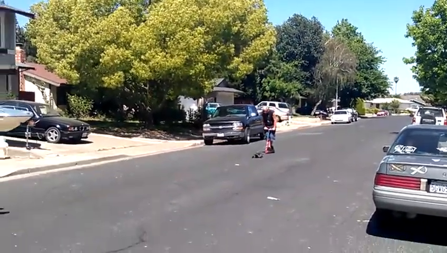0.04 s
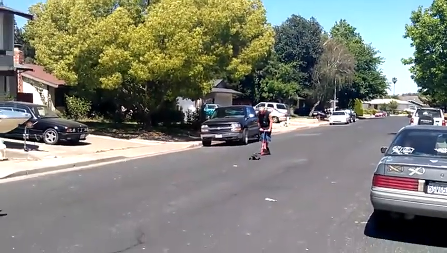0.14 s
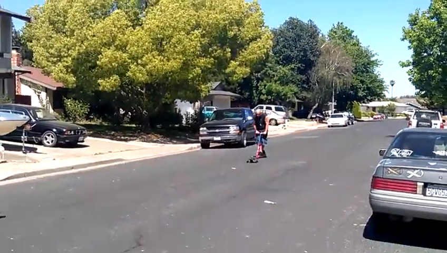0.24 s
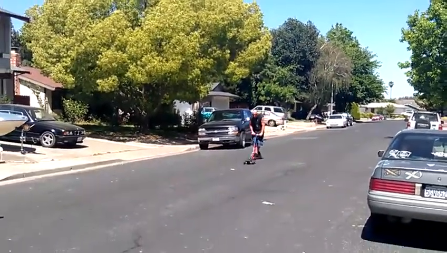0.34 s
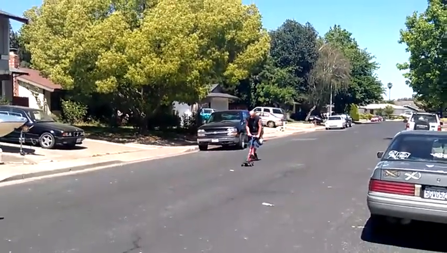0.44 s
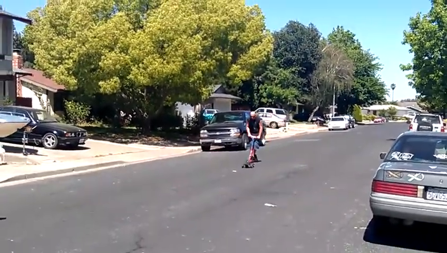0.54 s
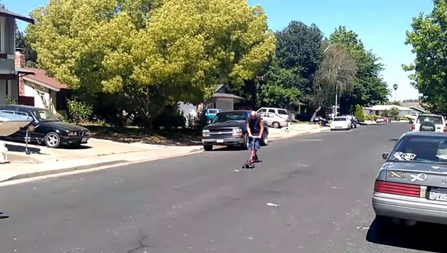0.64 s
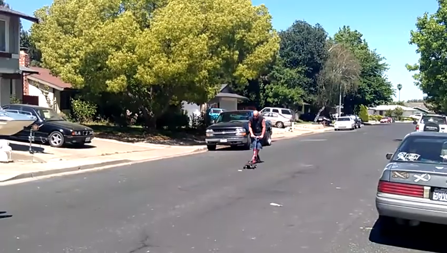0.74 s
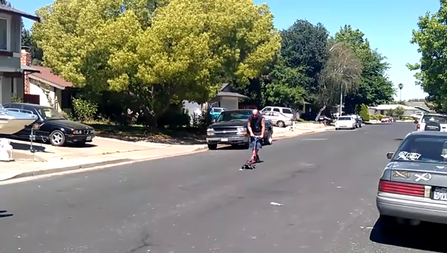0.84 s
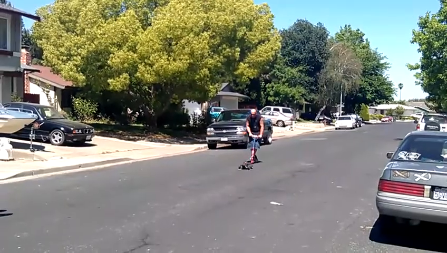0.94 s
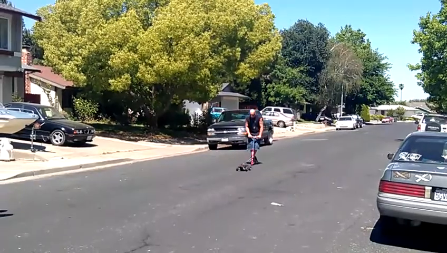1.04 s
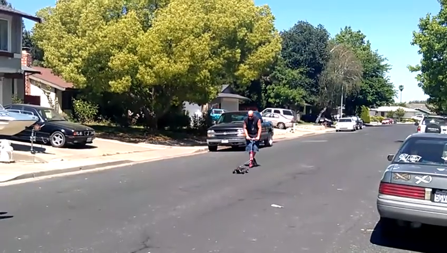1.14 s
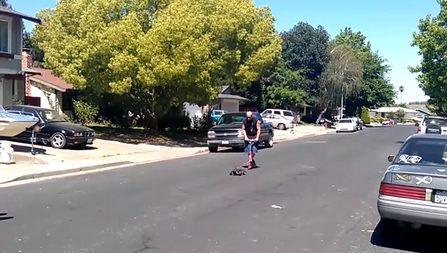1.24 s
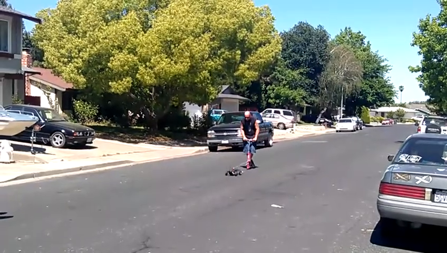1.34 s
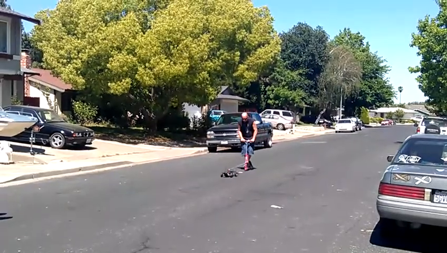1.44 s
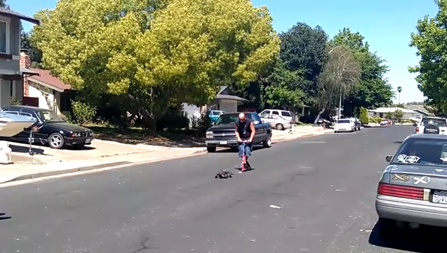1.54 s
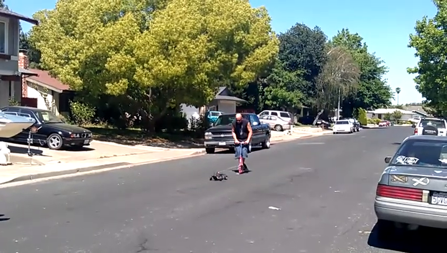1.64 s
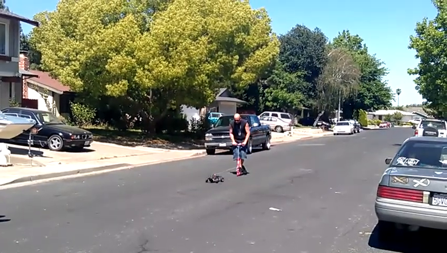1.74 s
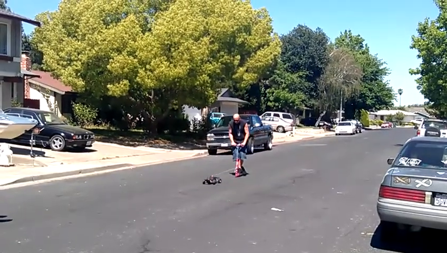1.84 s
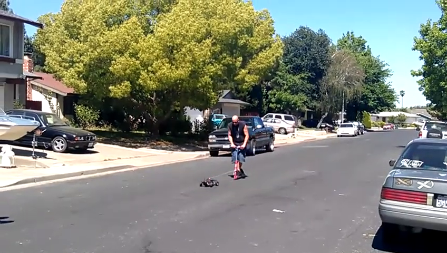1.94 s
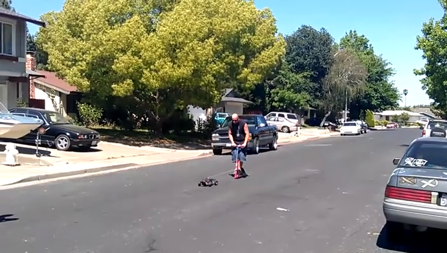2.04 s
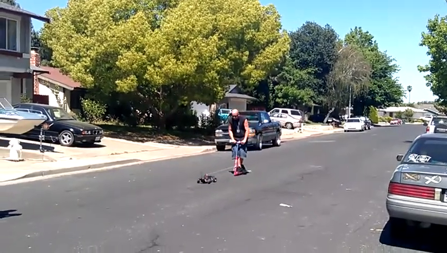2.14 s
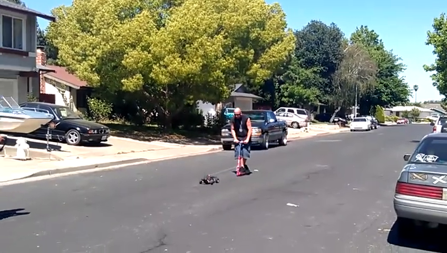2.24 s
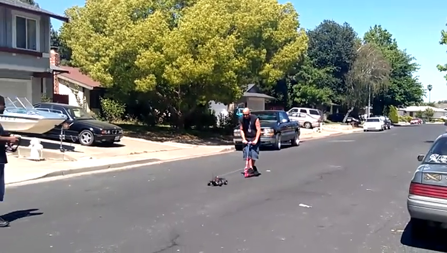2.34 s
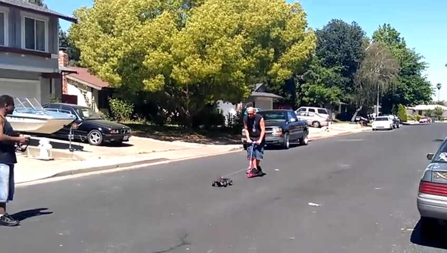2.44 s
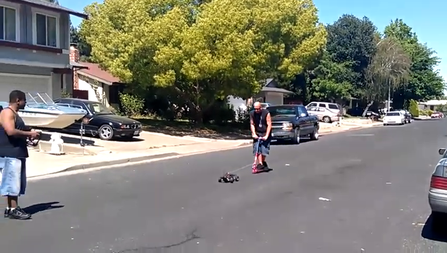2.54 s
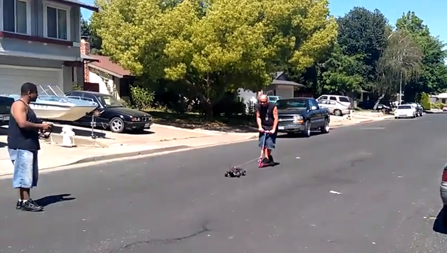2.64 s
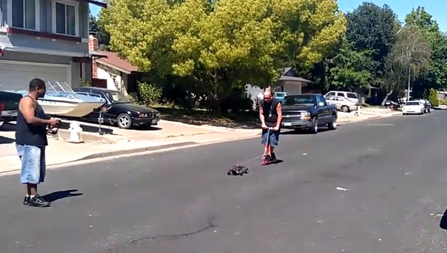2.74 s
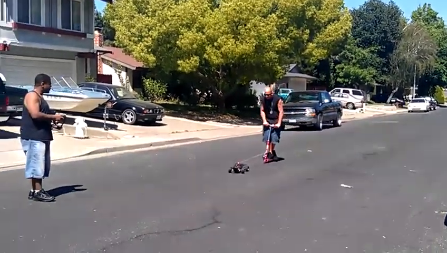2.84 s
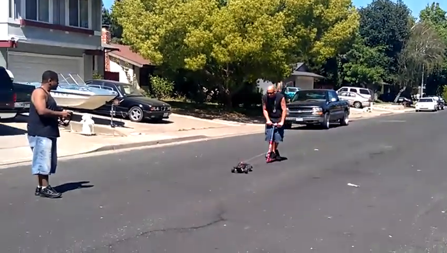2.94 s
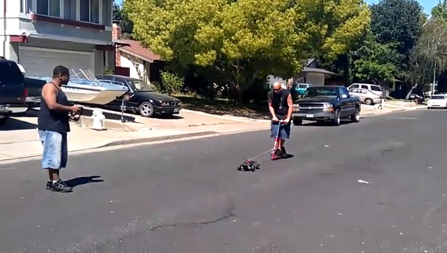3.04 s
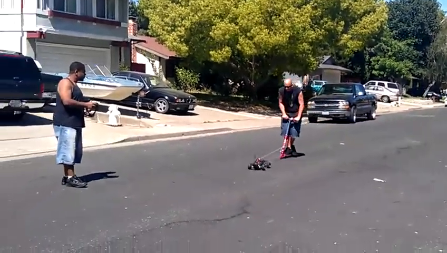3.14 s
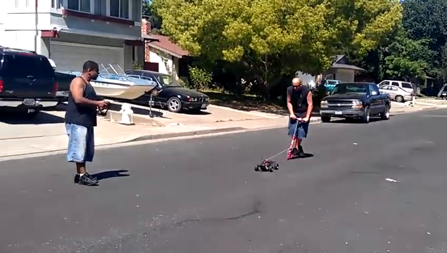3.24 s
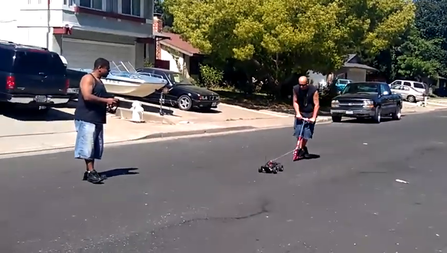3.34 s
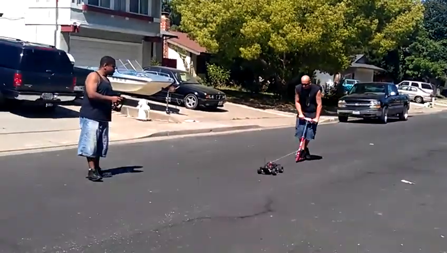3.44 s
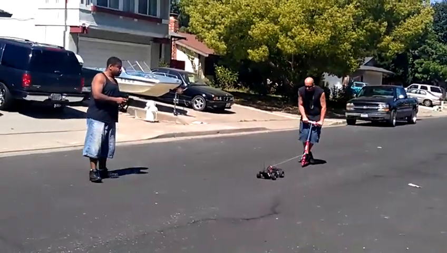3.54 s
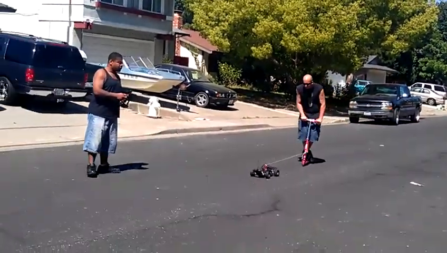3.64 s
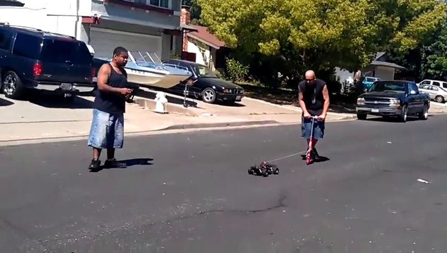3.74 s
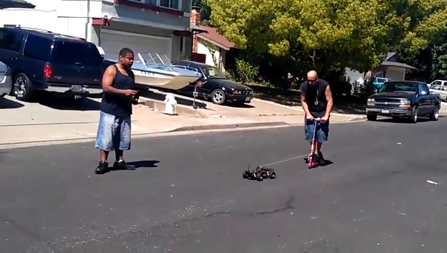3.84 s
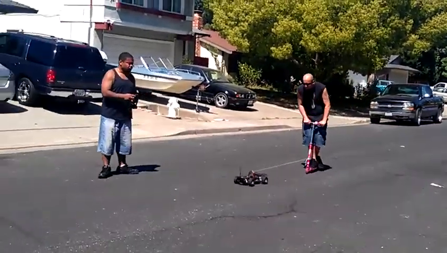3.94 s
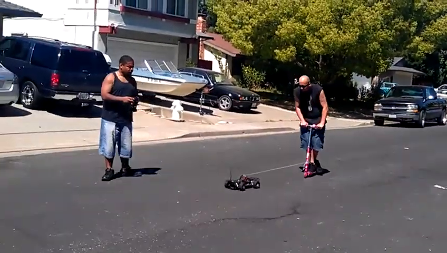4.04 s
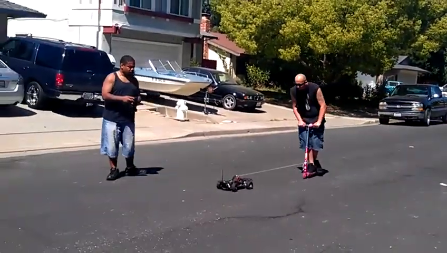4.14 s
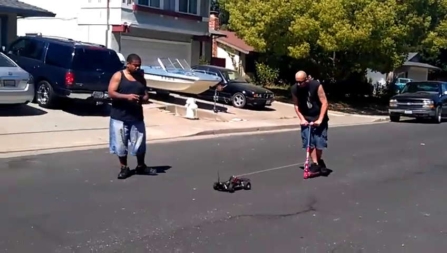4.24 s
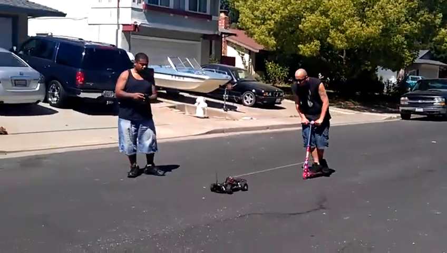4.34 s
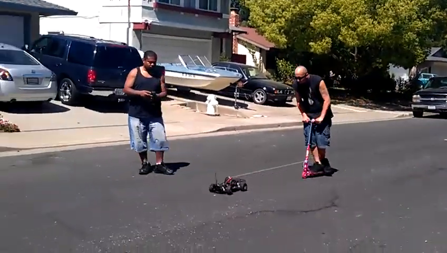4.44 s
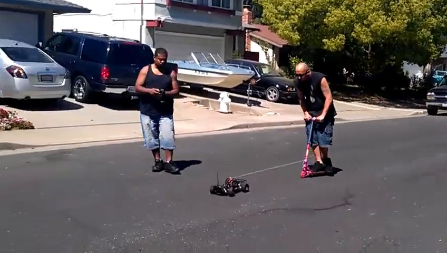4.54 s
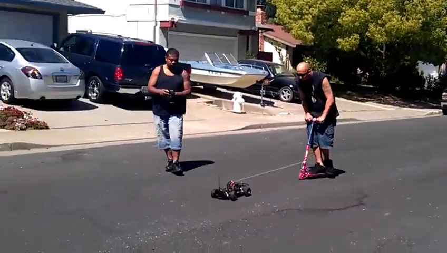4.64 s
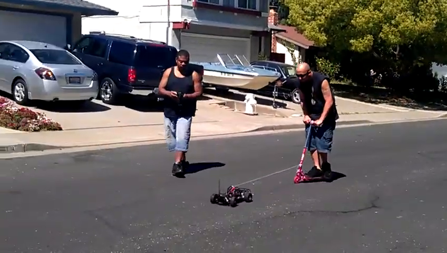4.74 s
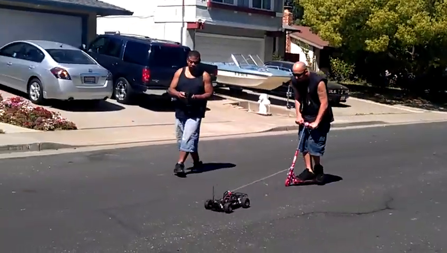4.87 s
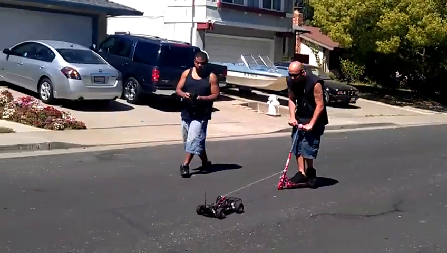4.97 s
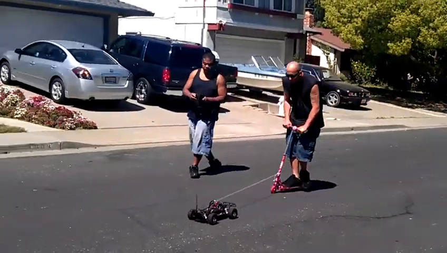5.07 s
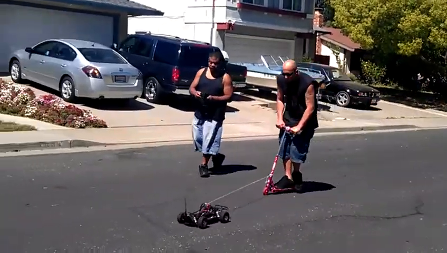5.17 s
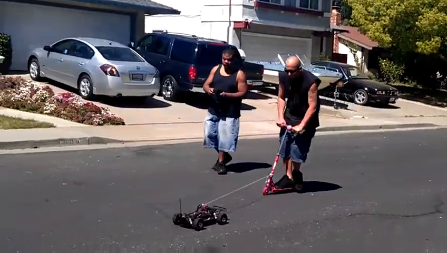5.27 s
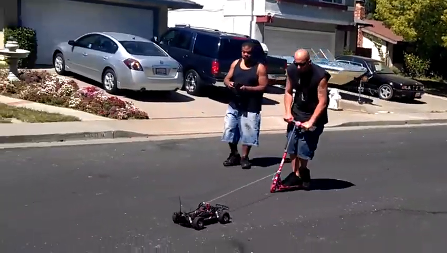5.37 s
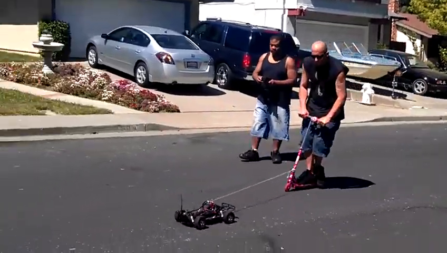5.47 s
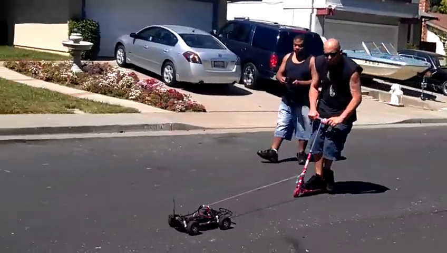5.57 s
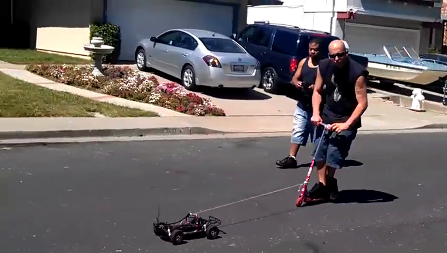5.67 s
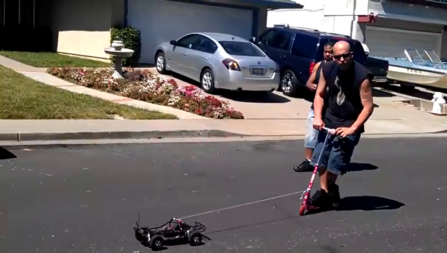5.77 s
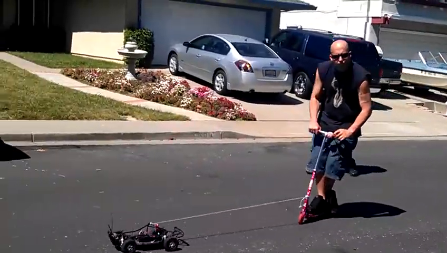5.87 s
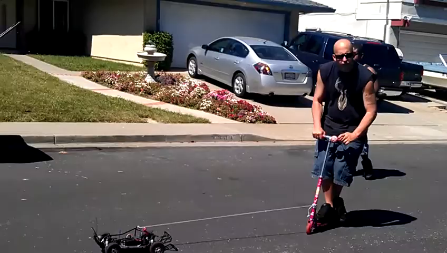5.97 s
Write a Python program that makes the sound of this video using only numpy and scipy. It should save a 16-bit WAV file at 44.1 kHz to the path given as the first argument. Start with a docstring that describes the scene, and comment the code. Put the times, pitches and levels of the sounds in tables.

```python
"""A small electric radio-controlled truck, towing a rider on a kick scooter, comes up an asphalt street.
At first its gear whine, summed from sine partials, surges weakly amid a rasp of filtered noise, with bright accents.
From about 2.7 s freely spinning tyres drive the whine higher; from about 3.8 s bursts of noise chatter at each hop.
Near 4.1 s the drivetrain is loudest and overloads the microphones; then the truck turns side-on, whining on over
a louder tyre roar and road hiss. House fronts answer with decaying noise echoes, and faint street air lies below."""
import sys
import numpy as np
from scipy import signal
from scipy.fft import rfft, irfft, next_fast_len
from scipy.io import wavfile
from scipy.ndimage import map_coordinates

SR = 44100
rng = np.random.default_rng(int(sys.argv[2]) if len(sys.argv) > 2 else 0)


def inscribe(sig):
    """Save sig as 16-bit PCM at rate SR to the path in sys.argv[1].

    A 1-D sig is mono; a 2-D sig holds one channel per row.
    Samples are clipped to [-1, 1] before scaling.
    """
    pcm = np.round(np.clip(np.atleast_2d(sig).T, -1, 1) * 32767)
    wavfile.write(sys.argv[1], SR, pcm.astype(np.int16))


N = 265041


def amp(db):
    """Level law: decibels to an amplitude ratio."""
    return 10 ** (np.asarray(db) / 20)


def unit(x):
    """Normalisation to an rms of 1."""
    return x / np.sqrt(np.mean(x ** 2) + 1e-20)


def clock():
    """Sampled time in seconds."""
    return np.arange(N) / SR


def along(points, hz):
    """Interpolation of (frequency, value) points on a logarithmic frequency axis."""
    f, v = np.transpose(points)
    return np.interp(np.log(hz + 1), np.log(f + 1), v)


def curves(rows):
    """Linear interpolation in time: one value per sample for each column after the time."""
    s, *cols = np.transpose(rows)
    return [np.interp(clock(), s, c) for c in cols]


def wobble(rate):
    """Band-limited fluctuation: a smooth random curve with rate knots a second."""
    knots = rng.standard_normal(int(N * rate / SR) + 4)
    return map_coordinates(knots, [np.arange(N) * rate / SR])


def filtered(x, response):
    """Linear filtering: the spectrum of x times a response of frequency."""
    m = next_fast_len(N + SR // 4)
    return irfft(rfft(x, m) * response(np.fft.rfftfreq(m, 1 / SR)), m)[..., :N]


# Stereo width of the noises: frequency_hz, side_minus_mid_db
STEREO_WIDTH = [(60, -1), (110, -5), (200, -17), (370, -11), (670, -22.5), (1230, -6.5), (2250, -13.5),
                (4120, -7), (7530, -2.5), (13800, 0)]


def rush(spectrum, grain_db):
    """Granular noise: millisecond grains of uneven strength, coloured in mid and side, with a mid of rms 1."""
    grains = rng.standard_normal((2, N)) * amp(grain_db * wobble(rate=700))

    def mid_and_side(hz):
        mid_db = along(spectrum, hz)
        return amp([mid_db, mid_db + along(STEREO_WIDTH, hz)])

    mid, side = filtered(grains, mid_and_side)
    return np.array([mid + side, mid - side]) / np.std(mid)


# Spectrum of the street air: frequency_hz, density_db (per Hz, relative)
STREET_SPECTRUM = [(20, -80), (45, -48), (80, -46), (170, -5), (350, -4), (550, -8), (900, -15.5),
                   (3000, -2), (9000, -44)]


def street_air():
    """Ambient noise: a faint, steady, broadband bed."""
    return amp(-43) * rush(STREET_SPECTRUM, grain_db=3.5)


# Decay of the echo off the houses: frequency_hz, t60_s
HOUSE_DECAY = [(200, 0.26), (2000, 0.4), (10000, 0.031)]


def houses(x):
    """Diffuse reverberation: house fronts and parked cars scatter a short, exponentially decaying answer."""
    hz, t, cells = signal.stft(rng.standard_normal((2, SR // 2)), SR, nperseg=256)
    decay = amp(-60 * t / along(HOUSE_DECAY, hz)[:, None])
    tail = signal.istft(cells * decay, SR, nperseg=256)[1]
    delayed = np.pad(tail, ((0, 0), (300, 0)))  # 300 samples, about 7 ms
    return signal.fftconvolve(x, delayed / np.linalg.norm(tail[0]), axes=1)[:, :N]


TURN_S, TURN_LENGTH_S = 4.04, .57  # start and length of the swing from head-on to side-on


def side_on():
    """Source orientation: 0 while the truck comes head-on, 1 once it shows its side."""
    return np.clip((clock() - TURN_S) / TURN_LENGTH_S, 0, 1)


FAR_DB, CLEAR_S = -11, 1.9  # the whine's deficit at the start, and when it stands clear of the rasp


def far_db():
    """Masking at a distance: how far the whine still sinks into the rasp."""
    return np.interp(clock(), [0, CLEAR_S], [FAR_DB, 0])


# Motor drive; more throttle means wider surges and more treble: start_s, throttle (0-1)
THROTTLE_CURVE = [(0, 0.62), (0.699, 0.52), (.85, 0.71), (1.25, 0.61), (1.58, 0.84), (1.7, 0.57),
                  (1.8, 0.97), (1.958, 0.53), (2.05, .8), (2.18, 0.67), (2.55, 0.5), (2.66, 0.81),
                  (2.85, 0.46), (3.25, 0.61), (3.65, 0.83), (4.279, 0.66), (4.399, .2), (4.72, 0.13),
                  (4.84, 0.55), (5.04, .22), (5.16, .5), (5.68, .62), (6, 0.57)]


def throttle():
    """Control input: the motor drive from 0 to 1."""
    return curves(THROTTLE_CURVE)[0]


# Drivetrain, growing as the truck nears and peaking as it faces the microphones: start_s, relative_level_db
DRIVE_LEVEL = [(0, -35), (.7, -30), (1.1, -26), (1.8, -26), (2.5, -28), (2.72, -23), (3, -26.5), (3.5, -21),
               (3.8, -14.5), (4.07, -8.5), (4.25, -13), (4.45, -20), (4.77, -19), (4.92, -14.5),
               (5.15, -13), (6, -15.5)]


def drive_db():
    """Approach of a source: the common level curve of whine and rasp."""
    return curves(DRIVE_LEVEL)[0]


# Road sounds, the hiss as at half throttle: start_s, tyre_roar_relative_db, road_hiss_relative_db
ROAD_LEVELS = [(0, -46, -49), (.3, -44.5, -41.5), (.73, -42, -38.5), (.9, -40, -31.5), (1.8, -36, -33.5),
               (3.5, -36, -31.5), (4.15, -20, -19.5), (4.6, -29, -26.5), (5, -22.5, -21),
               (5.75, -24.5, -22), (6, -19, -21.5)]
# Treble fizz of the motor over the road hiss: start_s, relative_level_db
FIZZ_LEVEL = [(0, -11.5), (.9, -15.5), (1.75, -21), (2.75, -14.5), (3.3, -17.5), (3.9, -15), (4.8, -16.5),
              (6, -7)]
# Spectra of tyre roar, rasp head-on, rasp side-on, road hiss and fizz: frequency_hz, density_db (per Hz, relative)
TYRE_SPECTRUM = [(41, -68), (70, -49), (186, -14.5), (422, -13), (554, -26), (642, -12), (718, -4),
                 (886, -0.5), (1000, -0.5), (1150, -2), (1250, -8), (1350, 7.5), (1760, -19), (2970, -120)]
RASP_HEAD_ON_SPECTRUM = [(710, -22.5), (1200, -61), (1360, -3.5), (1910, -6.5), (2420, 1), (2770, -6.5),
                         (3110, 2), (3390, -9), (3740, 0.5), (4800, -32.5), (6240, -55), (10600, -120)]
RASP_SIDE_ON_SPECTRUM = [(710, -55), (1200, -31.5), (1380, -22), (1700, -2.5), (1940, 7.5), (2090, 1),
                         (2230, -12.5), (2420, -3), (2580, 0), (2850, -2.5), (3040, -5.5), (3290, 0.5),
                         (3680, -8), (4030, -2), (4800, -15.5), (6240, -58), (10600, -120)]
HISS_SPECTRUM = [(2530, -17), (4300, 5.5), (4630, 6), (5190, 3), (6090, 5), (6970, 2), (7850, 6.5),
                 (8440, -9.5), (8800, -12), (11400, -14), (19400, -120)]
FIZZ_SPECTRUM = [(7500, -7.5), (8500, 12.5), (9000, -17.5), (9600, 3.5), (11000, -14), (11500, -38),
                 (11850, 14.5), (12200, -15), (12600, -22), (13200, -45), (15000, -90)]
FIZZ_FULL = 0.71  # throttle at which the fizz is fullest


def rolling_and_fizz(slip, rasp_db=-1, hiss_throttle_db=11, fizz_throttle_db=24):
    """Amplitude modulation: tyre roar, drivetrain rasp, road hiss and motor fizz swell with every slip."""
    tyre_db, road_db = curves(ROAD_LEVELS)
    push = throttle() - .5
    hiss_db = road_db + hiss_throttle_db * push
    throb = slip - np.mean(slip)
    bumps = wobble(rate=45)
    tyres = amp(tyre_db + 1.3 * throb + 2.2 * bumps) * rush(TYRE_SPECTRUM, grain_db=0.5)
    # the rasp changes colour as the truck turns
    side = side_on()
    head_on_rasp = .68 * np.sqrt(1 - side) * rush(RASP_HEAD_ON_SPECTRUM, grain_db=1.8)
    side_on_rasp = .85 * np.sqrt(side) * rush(RASP_SIDE_ON_SPECTRUM, grain_db=1.8)
    rasp = amp(drive_db() + rasp_db + 2 * throb + 1.5 * bumps) * (head_on_rasp + side_on_rasp)
    hiss = amp(hiss_db + 3.45 * throb + 1.54 * bumps) * rush(HISS_SPECTRUM, grain_db=1.5)
    unevenness = wobble(rate=60)  # treble fizz of the motor, uneven in level
    fizz_db = hiss_db + curves(FIZZ_LEVEL)[0] + fizz_throttle_db * np.minimum(push, FIZZ_FULL - .5)
    fizz = amp(fizz_db + 3 * throb + 3 * bumps + 3 * unevenness) * rush(FIZZ_SPECTRUM, grain_db=4)
    return tyres + rasp + hiss + fizz


# Short bright accents: start_s, relative_level_db
ACCENT_TIMES = [(0.267, -25), (0.9346, -15), (1.3116, -16), (1.4813, -18), (1.7954, -8), (2.6783, -9.5),
                (2.7786, -7.5), (3.8222, -7)]
# Bright spectrum shared by accents and chatter: frequency_hz, density_db (per Hz, relative)
CLATTER_SPECTRUM = [(30, -60), (100, -44), (500, -13), (800, -7), (1500, 4), (2150, -1), (2600, 3),
                    (2950, 1.5), (3300, 3.5), (4300, -3.5), (5000, -5), (8200, -5.5), (8900, -16),
                    (12000, -14), (13500, -26)]


def accents(level_db=-3, ring_hz=3130, t60=0.026, onset=0.36, onset_t60=0.013, dull_hz=8000):
    """Damped oscillation: short bright accents, ringing near 3 kHz with a noisy onset."""
    out = np.zeros((2, N + SR))
    t = np.arange(SR // 10) / SR
    for s, db in ACCENT_TIMES:
        pitch_hz = ring_hz * (1 + 0.008 * rng.standard_normal())
        ring = np.sin(2 * np.pi * pitch_hz * t) * amp(-60 * t / t60)
        noise = onset * rng.standard_normal((2, len(t))) * amp(-60 * t / onset_t60)
        start = round(s * SR)
        out[:, start:start + len(t)] += amp(db + level_db) * (ring + noise)
    return filtered(out[:, :N], lambda hz: amp(along(CLATTER_SPECTRUM, hz)) / (1 + (hz / dull_hz) ** 6))


# Hops of the truck, each time the middle of its burst: time_s, relative_level_db, length_s
HOPS = [(3.754, -25, .02), (3.859, -6, 0.01), (3.95, -3.5, 0.022), (4.027, -8, 0.02), (4.068, -8, 0.037),
        (4.129, -10.5, .025), (4.182, -11, 0.0098), (4.207, -6, 0.022), (4.246, -12, 0.018),
        (4.309, -6, 0.028), (4.352, -8, 0.013), (4.864, -6, 0.03), (4.888, -8.5, 0.029), (4.961, -6, .034),
        (5.007, -12, 0.022), (5.302, -2, 0.025), (5.327, -6, 0.038), (5.655, -21, 0.0088),
        (5.838, -25, .015)]
# Low, wide noise under each burst, as from overloaded microphones: frequency_hz, density_db (per Hz, relative)
LOW_NOISE_SPECTRUM = [(20, -27), (60, -9), (200, -8), (400, -9.5), (900, -21.5), (3000, -70)]


def chatter(level_db=-1.5, low_noise_db=-19, rattle_db=3.5):
    """Repeated impact: each hop sets loose parts rattling in a short uneven burst, with low, wide noise under it."""
    t = clock()
    power = np.zeros(N)
    for s, db, length in HOPS:
        power += amp(db) ** 2 * np.exp(-np.minimum((2 * (t - s) / length) ** 2, 50))
    # independent in each channel
    low_noise = unit(filtered(rng.standard_normal((2, N)), lambda hz: amp(along(LOW_NOISE_SPECTRUM, hz))))
    rattle = amp(level_db + rattle_db * wobble(rate=200)) * rush(CLATTER_SPECTRUM, grain_db=2.0)
    return np.sqrt(power) * (rattle + amp(low_noise_db) * low_noise)


# Switching tone of the speed controller: start_s, relative_level_db
SWITCH_TONE = [(0, -65), (.75, -57), (1.2, -37), (2.1, -50), (2.8, -38.5), (3.6, -38), (4, -24.5),
               (4.35, -20), (4.5, -34), (4.75, -27.5), (4.98, -20), (5.12, -31), (5.32, -20.5),
               (5.6, -24.5), (6, -41)]
SWITCH_HZ = 5871


def controller(level_db=-2.5, waver_db=2.5):
    """Electromagnetic excitation: the controller chops the motor current at a fixed rate, and the windings sing."""
    drift = 0.84 * np.array([wobble(rate=51), wobble(rate=32)])
    tone = np.sqrt(2) * np.sin(2 * np.pi * SWITCH_HZ * clock() + drift)
    return tone * amp(curves(SWITCH_TONE)[0] + level_db + waver_db * wobble(rate=20))


# Resonances of the plastic chassis: frequency_hz, width_hz, relative_level_db
CHASSIS_MODES = [(862, 410, -6.5), (1330, 41, -25.5), (1860, 237, 3), (2477, 260, 2.5), (3181, 253, 3.5),
                 (3740, 360, 4), (4120, 175, 2.5), (5760, 1700, -2.5), (7306, 870, -13)]


def shell(hz):
    """Modal radiation: how strongly the resonant chassis radiates each frequency."""
    power = 0
    for mode_hz, width_hz, db in CHASSIS_MODES:
        power = power + amp(db) ** 2 / (1 + ((hz * hz - mode_hz * mode_hz) / (hz * width_hz + 1)) ** 2)
    return np.sqrt(power)


# Rhythm in which the tyres slip and grip: start_s, surges_per_s
SURGE_RHYTHM = [(0.0, 20.51), (0.3, 19.57), (0.8, 21.04), (1.15, 22.1), (1.45, 20.79), (2.6, 19.51),
                (3.5, 21.67), (4.2, 21.51), (4.8, 19.06), (5.25, 21.03), (5.65, 22.81), (6.0, 21.9)]
# Nominal gear-mesh pitch while the tyres hold: start_s, pitch_hz
GRIP_PITCH = [(0, 1279), (1.3, 1262), (2.2, 1210), (3.001, 1258), (3.7, 1315), (4.601, 1385), (5.2, 1407),
              (6, 1428)]
# Hardest surges, when the tyres spin freely: time_s, nominal_top_pitch_hz, relative_level_db (whine at the top)
FREE_SPINS = [(2.737, 1808, -24), (3.642, 1789, -14.5), (3.74, 1965, -16), (3.835, 2060, -14.5),
              (3.922, 2060, -14), (4.01, 1766, -5.5), (4.055, 1680, -6.5), (4.105, 1846, 1.5),
              (4.198, 1897, 1.5), (4.296, 1921, 0.5), (4.847, 1760, -6.5), (4.946, 1844, -1),
              (5.285, 1749, -5), (5.336, 1719, -5.5), (5.383, 1797, -5.5), (5.426, 1786, -6.5),
              (5.519, 1719, -8.5), (5.651, 1877, -5), (5.697, 1932, -6.5), (5.739, 1896, -8.5),
              (5.829, 1860, -6)]
SWING_HZ, SWING_SCATTER = 653, .08  # rise of the mesh pitch in a surge at full throttle; chance share of it
# the surge after a wheelspin loses REBOUND of the spin's excess over TRACTION times a usual rise
REBOUND, TRACTION = .9, .75
BITE_S = .0015  # time that the gear teeth take to bite


def motor(roundness=1.6, lead=0.0052, slack=0.46, surge_db=3.0, side_db=5, scatter_db=-1.05):
    """Stick-slip: speed arches up in each surge and falls back on gripping; gives slip (0-1), pitch and strength."""
    (rate,), (grip_hz,) = curves(SURGE_RHYTHM), curves(GRIP_PITCH)
    surge_count = np.cumsum(rate) / SR  # a whole number at the top of each surge
    nearest = np.round(surge_count).astype(int)
    tops = np.minimum(np.searchsorted(surge_count, np.arange(nearest[-1] + 1)), N - 1)
    chance = rng.standard_normal((len(tops), 2))
    # the throttle sets each surge's height; a wheelspin robs the one after it
    rise = SWING_HZ * throttle()[tops] * (1 + SWING_SCATTER * chance[:, 0])
    spin_s, spin_hz, spin_db = np.transpose(FREE_SPINS)
    spins = nearest[(spin_s * SR).astype(int)]
    spin_rise = spin_hz - grip_hz[tops[spins]]
    excess = spin_rise - TRACTION * rise[spins]
    rise[spins + 1] -= np.clip(REBOUND * excess, 0, rise[spins + 1])
    rise[spins] = spin_rise
    # higher surges are louder, most of all from the side
    place_db = (drive_db() + far_db() + side_db * side_on())[tops]
    strength = rise / SWING_HZ * amp(place_db + surge_db + scatter_db * chance[:, 1])
    strength[spins] = amp(spin_db) / shell(spin_hz)
    slip = np.abs(np.cos(np.pi * surge_count)) ** roundness
    # the teeth bite abruptly just before the top, once the backlash is taken up
    after_top_s = (surge_count - nearest) / rate
    bite = (1 + np.tanh((after_top_s + lead) / BITE_S)) / 2
    pitch = grip_hz + rise[nearest] * slip
    return slip, pitch, strength[nearest] * (slack + (1 - slack) * bite)


# Overtones of the gear mesh: multiple_of_nominal_pitch, relative_level_db
GEAR_OVERTONES = [(2, 7.5), (3, 1.5), (4, 5)]
GEAR_SIDE_DB = -3  # change of the steady gear tones once side-on
COAST_DB = 13.5  # side-on, the steady gear tones gain this much per unit of throttle let off
FACING_S, FACING_WIDTH_S, FACING_DB = 3.947, 0.28, 3  # the overtones beam at the microphones before the turn
HALF_SIDE_DB = 3.5  # the tone about an octave under the mesh gains this much side-on


def whine(slip, pitch, surge, surge_db=1.0, steady_db=-1, half_db=-11.5, swell_db=-2.5, jitter=.011,
          rough_db=2.1, overtone_db=-4, glint=2.76):
    """Gear-mesh tones and resonance: the mesh arches cleanly; ragged overtones glint at chassis resonances."""
    phase = 2 * np.pi * np.cumsum(pitch * (1 + jitter * wobble(rate=460))) / SR

    def partial(order):
        """Phase modulation: one sine partial roughened in level and phase."""
        size = amp(rough_db * (wobble(rate=270) + np.sqrt(order) / 2 * wobble(rate=40)))
        # higher partials reach the two ports less alike and suffer more from uneven teeth
        skew = .14 * order * wobble(rate=30)
        tooth_error = .22 * (order - 1) ** 2 * wobble(rate=700)
        return np.sqrt(2) * size * np.sin(order * phase + tooth_error + np.array([skew, -skew]))

    coasting = .5 - throttle()
    level = amp(drive_db() + far_db() / 2 + side_on() * (GEAR_SIDE_DB + COAST_DB * coasting))
    surging = amp(surge_db) * surge * slip
    steady = amp(steady_db) * level * (1 - slip / 2)
    mesh_level = np.hypot(surging, steady)
    mesh = shell(pitch) * partial(0.99)  # sounds 1 % under the nominal pitch
    half_tone = amp(half_db + HALF_SIDE_DB * side_on()) * shell(pitch / 2) * partial(.5)
    teeth = amp(swell_db * slip) * sum(amp(db) * partial(round(order)) for order, db in GEAR_OVERTONES)
    overtones = unit(filtered(teeth, lambda hz: shell(hz) ** glint))  # shaped by gear case and body in turn
    beam_db = FACING_DB * np.exp(-((clock() - FACING_S) / FACING_WIDTH_S) ** 2)
    return mesh_level * (mesh + half_tone) + amp(overtone_db + beam_db) * level * overtones


# Balance as the microphones follow the truck: start_s, left_minus_right_db
BALANCE = [(0, -0.4), (2.5, -0.7), (3.8, -0.3), (4.7, -0.5), (6, -1.2)]
# Response of the two microphone ports: frequency_hz, left_minus_right_db
PORT_BALANCE = [(60, .5), (120, -2), (230, -0.7), (460, 1.3), (910, 2), (1800, -.5), (3500, .8), (6500, -5),
                (12500, 5.5)]


def scene():
    """Superposition: direct sound, echo, rolling noise, fizz and street air add at the two microphone ports."""
    slip, pitch, surge = motor()
    truck = whine(slip, pitch, surge) + controller() + chatter() + accents()
    wet_db = np.interp(clock(), [0, 4], [-9, -18])  # the direct sound gains on the echo as the truck nears
    echo = amp(wet_db) * houses(truck)
    sides = np.array([[.5], [-.5]])
    heard = (truck + echo + rolling_and_fizz(slip) + street_air()) * amp(sides * curves(BALANCE)[0])
    return filtered(heard, lambda hz: amp(sides * along(PORT_BALANCE, hz)))


TOP_HZ = 14400  # upper edge of the band


def record(dry, ceiling=1, hardness=14, low_cut_hz=85, rumble_cut_hz=55):
    """Saturation and band limiting: microphones lose deep bass and clip the loudest surges; the band is then cut."""
    heard = filtered(dry, lambda hz: 1 - 1 / (1 + (hz / low_cut_hz) ** 6))
    clipped = heard / (1 + np.abs(heard / ceiling) ** hardness) ** (1 / hardness)
    trimmed = filtered(clipped, lambda hz: 1 - 1 / (1 + (hz / rumble_cut_hz) ** 2))
    return filtered(trimmed, lambda hz: 1 / (1 + (hz / TOP_HZ) ** 60))


dry = scene()
out = record(dry)
inscribe(out)
```